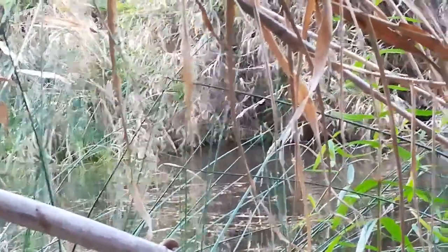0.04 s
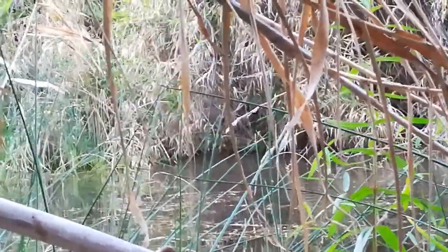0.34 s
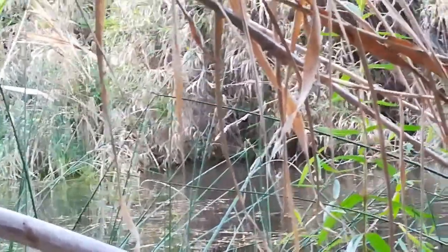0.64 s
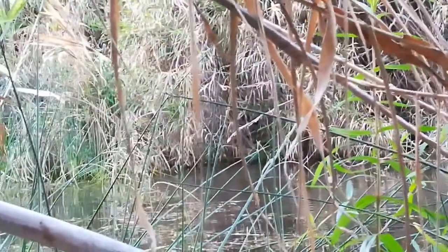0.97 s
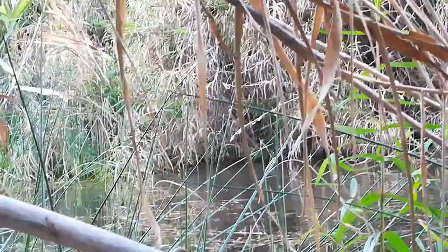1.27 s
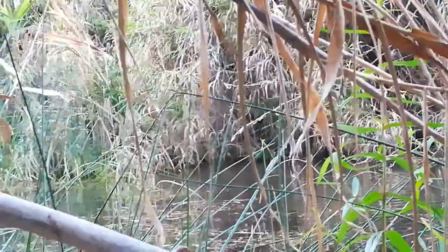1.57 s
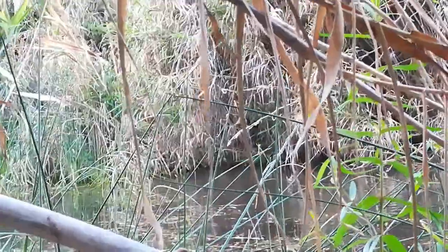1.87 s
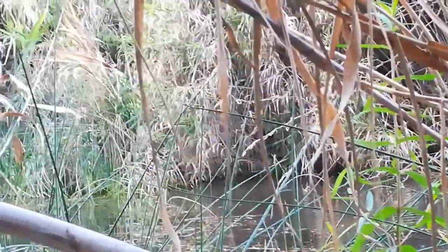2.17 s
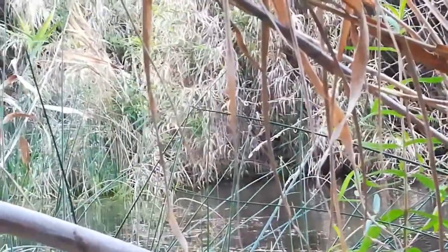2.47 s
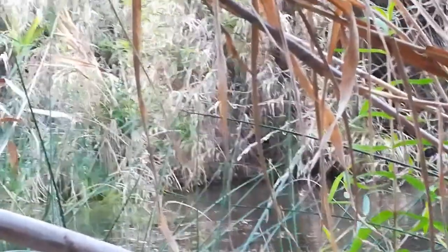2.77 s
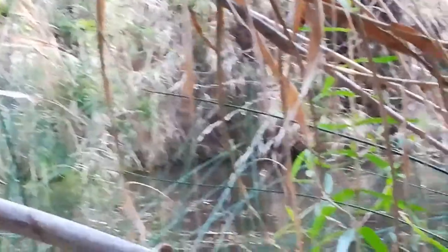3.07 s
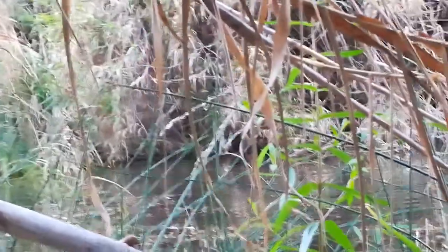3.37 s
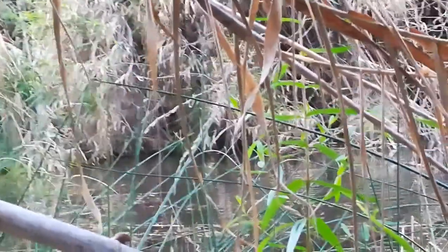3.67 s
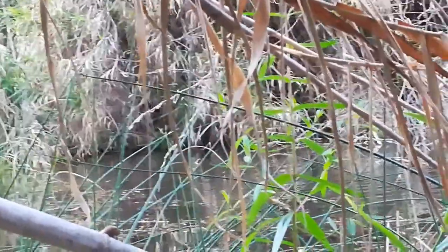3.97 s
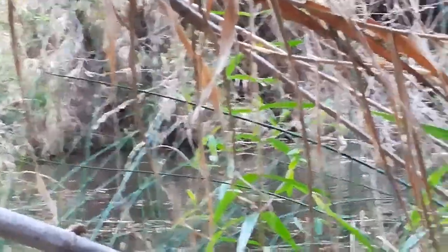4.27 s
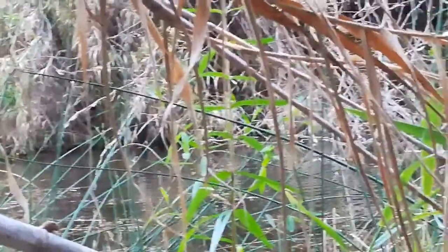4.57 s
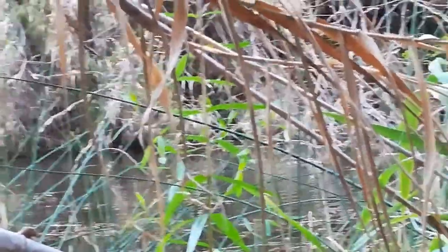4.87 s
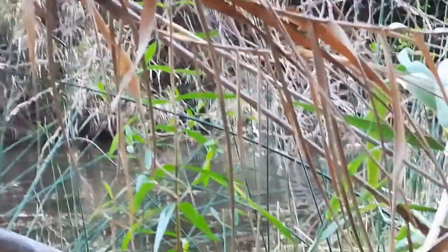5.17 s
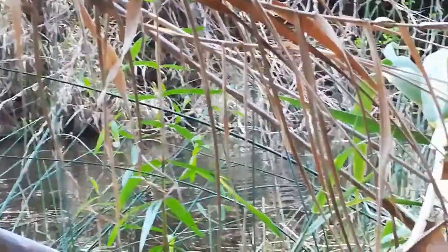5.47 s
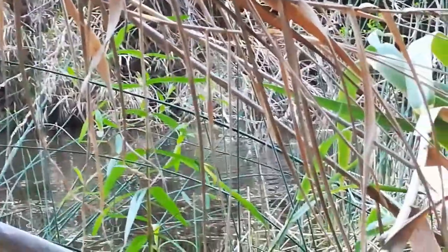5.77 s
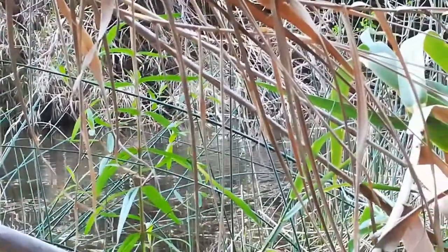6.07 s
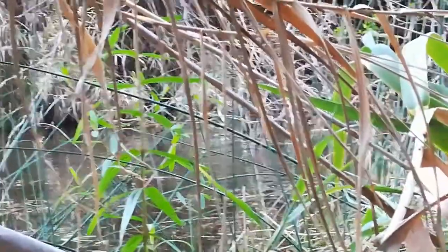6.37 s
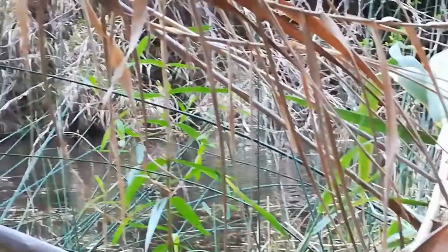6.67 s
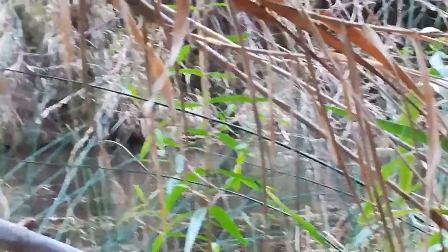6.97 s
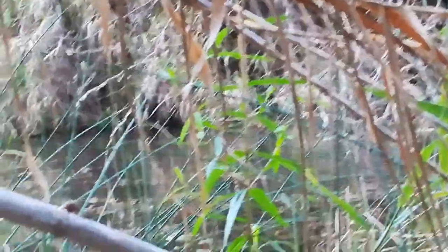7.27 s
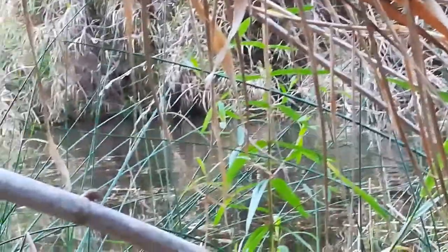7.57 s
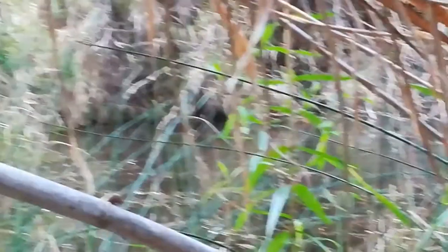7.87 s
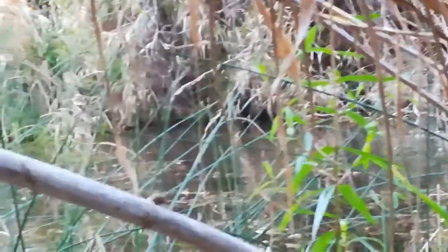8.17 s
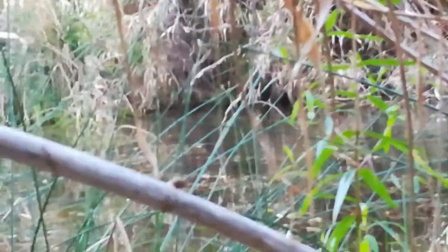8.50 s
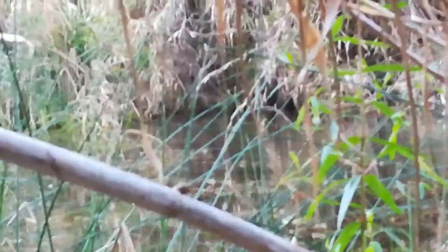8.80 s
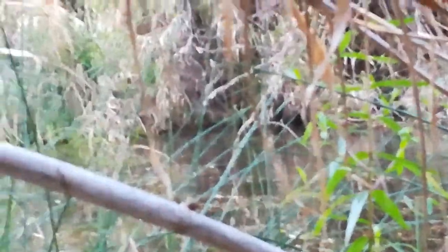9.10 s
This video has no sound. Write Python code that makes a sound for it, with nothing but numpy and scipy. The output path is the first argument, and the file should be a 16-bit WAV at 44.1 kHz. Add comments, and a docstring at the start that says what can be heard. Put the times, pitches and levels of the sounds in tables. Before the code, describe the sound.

A wide, steady hiss of reeds and water fills the whole stretch, growing slightly louder over a very faint rumble of distant air. At about 0.2 seconds a small warbler, ahead and a little left, gives a hard tick. From 0.6 seconds it sings one jumbled verse: quick high slurs, a nasal note near 1 second, scratchy trills around 1.3 to 1.5 seconds, then more slurs and fluted whistles, closing on two whistles at about 3 seconds. The song stands well above the hiss, and each note leaves a short tail among the stems. Afterwards, quiet drops plip nearby now and then between about 4 and 8.2 seconds. Dry stems snap softly three times between 4.4 and 4.8 seconds, more sharply at 6.8, and brush again near 8.2. Very faint drips come from across the pool at random throughout.

```python
"""A reed bed by a pool, heard through a stereo microphone. Reeds and water hiss all around from the start,
over a faint rumble of far-off air. Ahead and a little left, a small warbler sings one verse with its
syrinx: a hard tick, then quick slurs, one nasal note and scratchy trills, with fluted whistles among them
and at the close. The stems scatter each note and leave a short tail. After the song, a dry stem snaps or
a drop plips nearby now and then; faint drips come from across the pool at random times throughout."""
import sys
import numpy as np
from scipy import signal
from scipy.fft import rfft, irfft, next_fast_len
from scipy.io import wavfile
from scipy.ndimage import uniform_filter1d

SR = 44100
rng = np.random.default_rng(int(sys.argv[2]) if len(sys.argv) > 2 else 0)


def store_pcm(level_fs):
    """Save levels as 16-bit WAV."""
    pcm = np.round(np.clip(level_fs, -1, 1) * 32767).astype(np.int16)
    wavfile.write(sys.argv[1], SR, np.atleast_2d(pcm).T)


N = 411894

# Spectrum of the reeds and water all around: frequency_hz, relative_db
HISS_SPECTRUM = [(410, -29), (700, -12), (873, -7), (1030, -4), (1240, -3), (1360, -6), (1630, -2),
                 (2140, -1.5), (2610, -4), (3250, -1), (3700, -2.5), (6650, 2), (10800, -11),
                 (15100, -18.5), (15700, -20)]
# Narrow humps and dips in the hiss that both channels share: centre_hz, width_hz, gain_db
HISS_HUMPS = [(1130, 350, 2.5), (3250, 480, 2), (3760, 260, -3), (5900, 730, -2), (6600, 160, 0)]
# Spectrum of the far-off air: frequency_hz, relative_db
RUMBLE_SPECTRUM = [(15, -67), (25, -26), (45, -10.5), (108, -1.5), (236, -0.5), (369, -4), (424, -4.5),
                   (530, -6), (700, -5.5), (910, -14), (1540, -120)]
# Stereo width of the background: frequency_hz, side_minus_mid_db
STEREO_WIDTH = [(60, -24), (110, -12.5), (200, -8), (380, 2.5), (700, 4), (1290, 0), (2380, 1), (4400, -1),
                (8120, 0), (15000, 0.5)]
# Its balance at the microphone: frequency_hz, left_minus_right_db
STEREO_LEAN = [(60, 0.0), (110, 0.0), (200, 0.0), (380, 0.5), (700, 0), (1290, 0), (2380, 2.0), (4400, 4),
               (8120, 2), (15000, -2.5)]
# The warbler's opening tick: start_s, length_s, level_db
TICK = (.164, 0.078, -19.5)
# The throat's colouring of the tick: frequency_hz, relative_db
TICK_SPECTRUM = [(880, -76), (1500, -40), (1900, -14), (2280, -23), (3240, -8.5), (3700, -6.5), (4540, 1),
                 (5720, -9), (8000, -28), (10400, -65), (17600, -120)]
# A pitched note has level_db at its crest and arch_db less at the end farther from the crest.
# Levels are those before the path through the reeds; crest_fraction and lift_fraction are of the length.
# Quick slurs: start_s, length_s, level_db, crest_fraction, arch_db, first_hz, middle_hz, last_hz
SLURS = [ (.594, 0.033, -16.5, 0.73, 14.5, 6970, 6010, 5460), (0.599, .013, -34, .4, 7, 5100, 4940, 4750),
         (.612, .023, -11.5, 0.85, 15, 4520, 4930, 4540), (0.635, .019, -21.5, 0, -0.5, 4790, 3630, 2550),
         (0.69, 0.024, -27, 0.8, -0.5, 1790, 2337, 1720), (0.719, 0.014, -26, 0.9, 9, 1846, 2070, 2650),
         (1.104, 0.14, -19, 0.6, 4, 5296, 5113, 4630), (1.643, 0.043, -16, .27, 5.5, 4680, 3880, 3730),
         (1.687, 0.017, -18.5, 0.55, -4.5, 3580, 2695, 2990),
         (1.702, 0.016, -15, 0.22, 23, 3100, 2620, 1820), (1.751, 0.061, -13, 0.78, 10, 3140, 3230, 2940),
         (1.904, .020, -24, 0.34, 20, 2750, 3290, 4350), (2.417, .027, -16.5, 0.58, 10.5, 3080, 3440, 3300),
         (2.443, 0.027, -13.5, 0, 10.5, 3330, 2546, 2300), (2.504, 0.064, -16, 0.58, 4.5, 2782, 2675, 1864),
         ]
# Fluted whistles: start_s, length_s, level_db, crest_fraction, arch_db,
# first_hz, sagged_hz, last_hz, lift_fraction, scoop_depth_fraction
FLUTES = [ (.841, 0.065, -13.5, 0.54, 11.5, 3025, 3030, 3202, 0.52, 0.04),
          (1.916, .121, -15.5, 0.53, 15, 2444, 2410, 2590, .64, 0.18),
          (2.179, .107, -10, 0.7, 11, 3330, 3296, 3503, .58, 0.07),
          (2.690, .121, -17, 0.94, 5.5, 2460, 2326, 2475, .66, 0.32),
          (2.856, 0.11, -13.5, 0.98, 8, 3435, 3237, 3346, 0.65, 0), ]
# The nasal note: start_s, length_s, level_db, crest_fraction, arch_db, first_hz, middle_hz, last_hz
NASAL_NOTES = [(.949, .067, -22.5, 0.28, 9, 1434, 1316, 1300)]
# Its harmonics: harmonic_number, relative_db
NASAL_HARMONICS = [(1, -27), (2, -28), (3, 1.5), (4, -12), (5, -9.5), (6, -21)]
# Scratchy trills: start_s, length_s, level_db, crest_fraction, arch_db,
# first_hz, last_hz, rate_hz, swing_hz, roughness_fraction
TRILLS = [ (1.307, 0.029, -11.5, 0.57, 20, 4210, 3800, 174, 170, 0.11),
          (1.356, 0.025, -13, 0.56, 17, 3970, 3664, 172, 130, 0.17),
          (1.383, 0.021, -24.5, 0.2, 10, 3620, 3790, 185, 150, .22),
          (1.407, .051, -22.5, .2, 2, 4526, 4396, 250, 530, .42),
          (1.455, 0.0595, -21.5, 0.4, 3, 4505, 4420, 310, 450, .38),
          (2.065, 0.049, -19.5, 0.23, 10.5, 2230, 2133, 76, 190, 0.03), ]
# Drops on the near water: start_s, level_db, pitch_hz
DROPS = [(3.912, -41.5, 1040), (4.070, -41, 1640), (4.700, -35, 2140), (4.994, -43, 1650),
         (5.978, -36, 1680), (6.683, -38.5, 1220), (7.145, -41, 2780), (8.174, -31.5, 2000)]
# Dry stems snapping and brushing nearby: start_s, level_db, centre_hz, t60_s
SNAPS = [(4.441, -34, 2600, 0.054), (4.647, -34.5, 4000, 0.044), (4.796, -35, 2400, 0.04),
         (6.822, -26, 2980, 0.022), (6.856, -38, 5000, 0.2), (8.181, -37, 5300, 0.25)]
# The farther reeds scatter the middle of the song best and let low notes pass: frequency_hz, gain_db
REED_SCATTER = [(300, -35), (1500, -11), (2450, -5.5), (3250, 2), (4400, -0.5), (8000, -1)]


def gain_of(db):
    """Decibels to amplitude."""
    return 10 ** (np.asarray(db) / 20)


def unit_rms(x):
    """Scales to an rms of one."""
    return x / np.sqrt(np.mean(x ** 2) + 1e-20)


def db_at(spectrum, hz):
    """Reads a spectrum on a log-frequency axis."""
    points_hz, db = np.transpose(spectrum)
    return np.interp(np.log(hz + 1), np.log(points_hz + 1), db)


def coloured(noise, spectrum):
    """Gives white noise a spectrum."""
    size = noise.shape[-1]
    hz = np.fft.rfftfreq(size, 1 / SR)
    return irfft(rfft(noise) * gain_of(db_at(spectrum, hz)), size)


def wander(size, rate_hz):
    """A smooth random drift, of rms near one, that changes at about the given rate."""
    hz = np.fft.rfftfreq(size + SR, 1 / SR)
    drift = irfft(rfft(rng.standard_normal(size + SR)) * np.exp(-(hz / rate_hz) ** 2))
    return unit_rms(drift)[:size]


def ease(x, start, end):
    """A soft step from 0 to 1."""
    return np.sin(np.pi / 2 * np.clip((x - start) / (end - start), 0, 1)) ** 2


def envelope(level_db, edge_samples=130):
    """Turns a level curve into amplitude, opened and closed softly."""
    k = np.arange(len(level_db))
    from_edge = np.minimum(k, k[::-1])
    return gain_of(level_db) * np.sin(np.pi / 2 * np.minimum(from_edge / edge_samples, 1))


def add(mix, start_s, sound):
    """Mixes a sound in at its start time."""
    part = mix[max(round(start_s * SR), 0):][:len(sound)]
    part += sound[:len(part)]


def reed_hiss(patchy_db=0.84):
    """Reeds and water all around, as mid and side: noise with drifting louder and softer patches."""
    frames, hz = N // 256 + 5, np.fft.rfftfreq(1024, 1 / SR)
    mid_re, mid_im, side_re, side_im, patches = rng.standard_normal((frames, 513, 5)).T
    patches = uniform_filter1d(patches, 16, axis=0)  # smooth over frequency
    patches = unit_rms(uniform_filter1d(patches, 14, axis=1))  # and over time
    humps_db = sum(db * np.exp(-((hz - centre) / width) ** 2) for centre, width, db in HISS_HUMPS)
    mid = (mid_re + 1j * mid_im) * gain_of(humps_db)[:, None]
    side = side_re + 1j * side_im
    colour = gain_of(db_at(HISS_SPECTRUM, hz)[:, None] + patchy_db * patches)
    _, hiss = signal.istft(np.array([mid, side]) * colour, nperseg=1024, noverlap=768)
    return unit_rms(hiss[:, :N])


def background(hiss_db=-45.5, rumble_db=-62, growth_db_per_s=0.1915, flutter_db=0.5):
    """Wide, slowly growing hiss over the rumble of far-off air, whose bass sits in the centre."""
    t = np.arange(N) / SR
    fade_in_db = -2 * (1 - ease(t, 0.5, 1))
    swell_db = 2 * np.exp(-(t - 2.16) ** 2)  # one broad swell during the song
    hiss_level_db = hiss_db + fade_in_db + growth_db_per_s * t + swell_db
    hiss = reed_hiss() * gain_of(hiss_level_db + flutter_db * wander(N, rate_hz=9.8))
    size = next_fast_len(N)
    air = coloured(rng.standard_normal((2, size)), RUMBLE_SPECTRUM)[:, :N]
    rumble = unit_rms(air) * gain_of(rumble_db + swell_db)
    hz = np.fft.rfftfreq(size, 1 / SR)
    mid, side = rfft(hiss + rumble, size)
    side *= gain_of(db_at(STEREO_WIDTH, hz))
    lean = gain_of(db_at(STEREO_LEAN, hz) / 2)
    return irfft(np.array([(mid + side) * lean, (mid - side) / lean]), size)[:, :N]


def tick(length_s, level_db, rise_s=0.0086, hold_until_s=0.011, fall_db_per_s=803, linger_db=-18.5):
    """A hard, toneless burst coloured by the throat: it rises, holds, and falls to a faint rasp."""
    t = np.arange(round(length_s * SR)) / SR
    burst = unit_rms(coloured(rng.standard_normal(len(t)), TICK_SPECTRUM))
    fall_db = np.clip((hold_until_s - t) * fall_db_per_s, linger_db, 0)
    return np.minimum(t / rise_s, 1) * envelope(level_db + fall_db) * burst


def reed_bed(sound, near_db, far_db, direct_db=-5, near_t60_s=0.12, far_t60_s=0.43, stems=28):
    """Paths to the microphone: the straight one, echoes off near stems, a tail from the reeds beyond."""
    t = np.arange(SR) / SR
    echoes = np.zeros((2, SR))
    delay_samples = 60 + 64 * np.arange(stems) + rng.integers(0, 64, (2, stems))
    np.put_along_axis(echoes, delay_samples, rng.choice([-1., 1.], delay_samples.shape), 1)
    echoes *= gain_of(-60 * t / near_t60_s)
    tail = coloured(rng.standard_normal((2, SR)), REED_SCATTER)
    tail *= gain_of(-60 * t / far_t60_s) * (1 - np.exp(-t / 0.0053))
    paths = gain_of(near_db) * echoes / np.linalg.norm(echoes, axis=1, keepdims=True)
    paths += gain_of(far_db) * tail / np.linalg.norm(tail, axis=1, keepdims=True)
    paths[:, 0] += gain_of(direct_db)  # from nearly straight ahead, it reaches both channels at once
    return signal.fftconvolve(sound[None], paths, axes=1)[:, :N]


def breath(length_s, level_db, crest, arch_db, attack_fraction=0.13, release_s=0.0075):
    """A note's progress from 0 to 1 and its amplitude: airflow builds, arches, and is shut off quickly."""
    progress = np.linspace(0, 1, round(length_s * SR))
    attack_db = -9 * np.maximum(1 - progress / attack_fraction, 0) ** 2
    release_db = -4 * np.maximum(1 - (1 - progress) * length_s / release_s, 0) ** 2
    from_crest = abs(progress - crest) / max(crest, 1 - crest)
    return progress, envelope(level_db + attack_db + release_db - arch_db * from_crest)


def arc(progress, first, middle, last):
    """One smooth bend through three pitches."""
    bow = (2 * middle - first - last) * 2 * progress * (1 - progress)
    return first + (last - first) * progress + bow


def syrinx_phase(hz, jitter=0.0065):
    """Phase of the syrinx, whose tension never holds quite still."""
    return 2 * np.pi * np.cumsum(hz * (1 + jitter * wander(len(hz), rate_hz=180))) / SR


def whistle(hz, octave_db=-41, crack_hz=260, steep_hz_per_s=95000):
    """An almost pure tone, its octave filtered out by the throat; the voice cracks where it plunges."""
    fall_hz_per_s = uniform_filter1d(-np.gradient(hz) * SR, size=200)
    plunge = np.clip(fall_hz_per_s / steep_hz_per_s, 0, 1) ** 2
    phase = syrinx_phase(hz + crack_hz * plunge * wander(len(hz), rate_hz=690))
    return np.sqrt(2) * (np.sin(phase) + gain_of(octave_db) * np.sin(2 * phase))


def slur(length_s, level_db, crest, arch_db, *pitches_hz, scoop_depth=0.064, scoop_s=0.0044):
    """A quick whistle that starts a little flat and sweeps along one arc."""
    progress, amplitude = breath(length_s, level_db, crest, arch_db)
    scoop = 1 - scoop_depth * np.exp(-progress * length_s / scoop_s)
    return amplitude * whistle(arc(progress, *pitches_hz) * scoop)


def flute(length_s, level_db, crest, arch_db, first_hz, sagged_hz, last_hz, lift_at, scoop_depth):
    """A held whistle: it scoops up from below, sags, then lifts to its last pitch."""
    progress, amplitude = breath(length_s, level_db, crest, arch_db)
    scoop = 1 - scoop_depth * np.exp(-progress / 0.079)
    sag_hz = (sagged_hz - first_hz) * ease(progress, 0.215, 0.434)
    lift_hz = (last_hz - sagged_hz) * ease(progress, lift_at, lift_at + 0.14)
    return amplitude * whistle((first_hz + sag_hz + lift_hz) * scoop)


def nasal(length_s, level_db, crest, arch_db, *pitches_hz, opening_db=10):
    """A low buzz whose third harmonic the throat lifts; the higher ones grow as the beak opens."""
    progress, amplitude = breath(length_s, level_db, crest, arch_db)
    phase = syrinx_phase(arc(progress, *pitches_hz), jitter=0.0039)
    beak_db = opening_db * (progress - 0.5)
    buzz = sum(gain_of(db + (k > 3) * beak_db) * np.sin(k * phase) for k, db in NASAL_HARMONICS)
    return amplitude * unit_rms(buzz)


def trill(length_s, level_db, crest, arch_db, first_hz, last_hz, rate_hz, swing_hz, roughness,
          throb_per_hz=0.0025, octave_db=-30):
    """A tone shaken fast in pitch and strength; uneven vibration turns it into a rasp."""
    progress, amplitude = breath(length_s, level_db, crest, arch_db)
    size = len(progress)
    glide_hz = first_hz + (last_hz - first_hz) * progress
    shake = syrinx_phase(np.full(size, rate_hz), jitter=0.18)
    rasp_hz = 650 * roughness * wander(size, rate_hz=1100)
    phase = syrinx_phase(glide_hz + swing_hz * np.sin(shake) + rasp_hz)
    tone = np.sin(phase) + gain_of(octave_db) * np.sin(2 * phase)
    throb = min(throb_per_hz * swing_hz, 1)  # a wide swing all but shuts the airflow once a cycle
    strength = 1 + throb * np.cos(shake) + roughness * wander(size, rate_hz=1050)
    return amplitude * unit_rms(strength * tone)


def far_drips(level_db=-50, spread_db=7, low_hz=950, high_hz=3200, count=36):
    """Faint drips across the pool, barely above the hiss, as rows of start_s, level_db, pitch_hz."""
    when, size, pitch = rng.random((count, 3)).T
    levels_db = level_db + spread_db * (2 * size - 1)
    return zip(when * N / SR, levels_db, low_hz * (high_hz / low_hz) ** pitch)


def drop(level_db, pitch_hz, t60_s=0.07, rise_per_s=3.4, splash_db=-4.5):
    """A soft splash, and a small bubble that rings and rises in pitch as it dies."""
    splash = snap(level_db + splash_db, pitch_hz, t60_s, width_octaves=0.77)
    t = np.arange(len(splash)) / SR
    bubble = np.sin(2 * np.pi * pitch_hz * t * (1 + rise_per_s * t / 2))
    return splash + envelope(level_db - 60 * t / t60_s) * bubble


def snap(level_db, centre_hz, t60_s, width_octaves=1):
    """A short, broad crack of noise: stem fibres breaking or, in a narrower band, a drop's splash."""
    size = SR // 8
    t, hz = np.arange(size) / SR, np.fft.rfftfreq(size, 1 / SR)
    band = np.exp(-(np.log2((hz + 1) / centre_hz) / width_octaves) ** 2)
    crack = irfft(rfft(rng.standard_normal(size)) * band, size)
    return unit_rms(crack) * gain_of(level_db - 60 * t / t60_s)


def scene(bird_db=-1, bird_left_db=2, incidental_left_db=1):
    """The warbler, louder on the left; snaps and drops reach the microphone with less scatter."""
    song, incidental = np.zeros(N), np.zeros(N)
    verse = (tick, [TICK]), (nasal, NASAL_NOTES), (slur, SLURS), (flute, FLUTES), (trill, TRILLS)
    for voice, notes in verse:
        for start_s, *note in notes:
            add(song, start_s, voice(*note))
    for start_s, *stem in SNAPS:
        add(incidental, start_s, snap(*stem))
    for start_s, level_db, pitch_hz in [*DROPS, *far_drips()]:
        add(incidental, start_s, drop(level_db, pitch_hz))
    leftward = np.array([[1], [-1]])  # left channel up, right channel down
    bird = gain_of(bird_db + bird_left_db * leftward) * reed_bed(song, near_db=-4, far_db=-10.5)
    poolside = gain_of(incidental_left_db * leftward) * reed_bed(incidental, near_db=-8, far_db=-12)
    return bird + poolside + background()


def record(dry, edge_hz=15780):
    """The recorder's band limit."""
    lowpass = signal.firwin(511, edge_hz, window=("kaiser", 9), fs=SR)
    return signal.oaconvolve(dry, lowpass[None], "same")


dry = scene()
out = record(dry)
store_pcm(out)
```